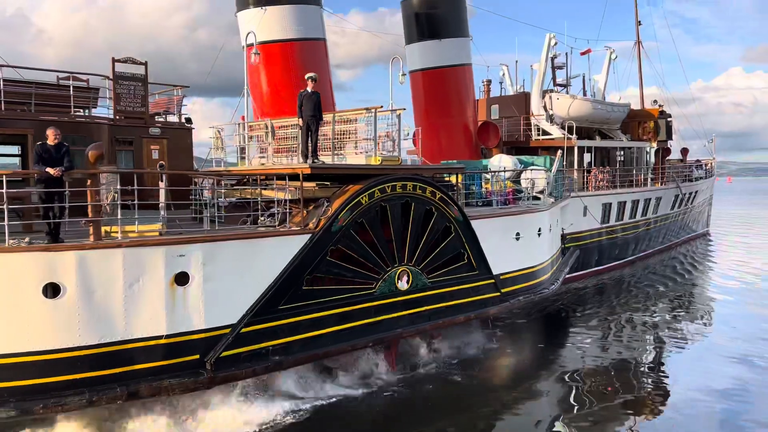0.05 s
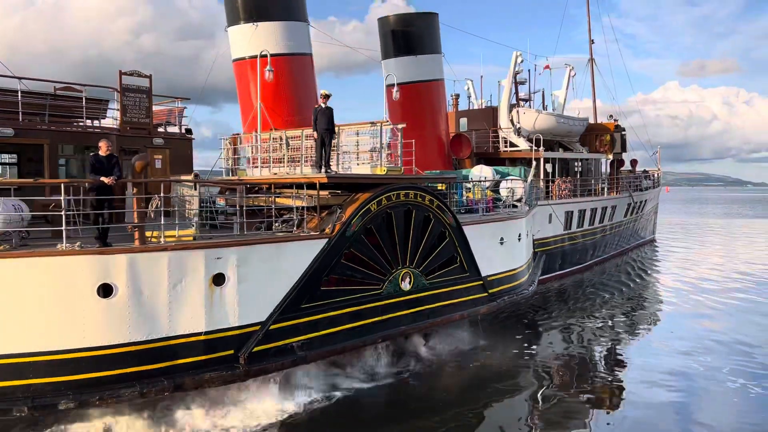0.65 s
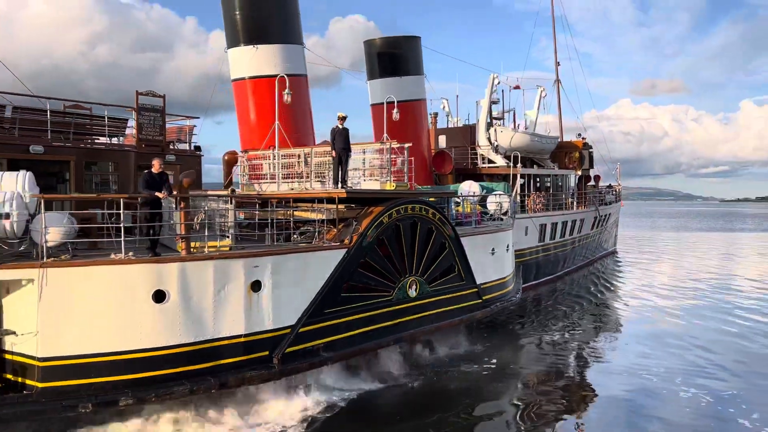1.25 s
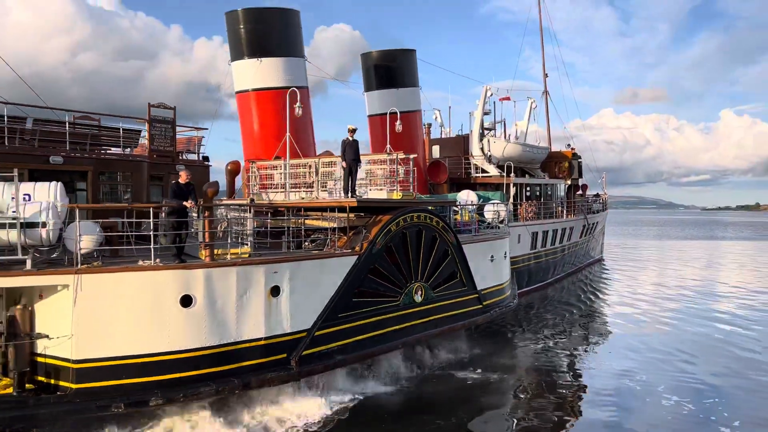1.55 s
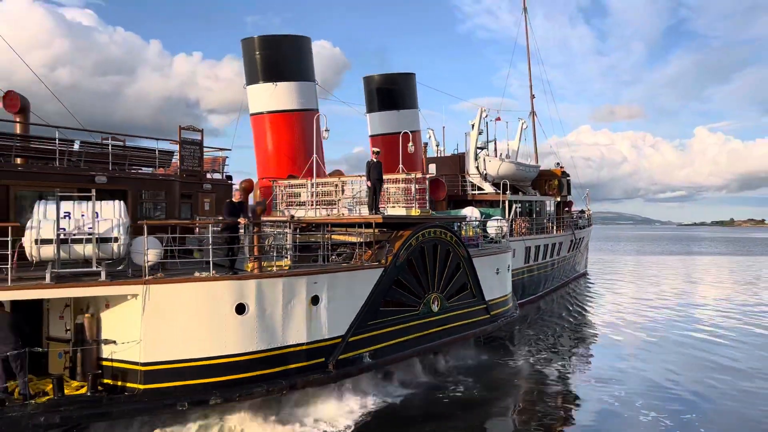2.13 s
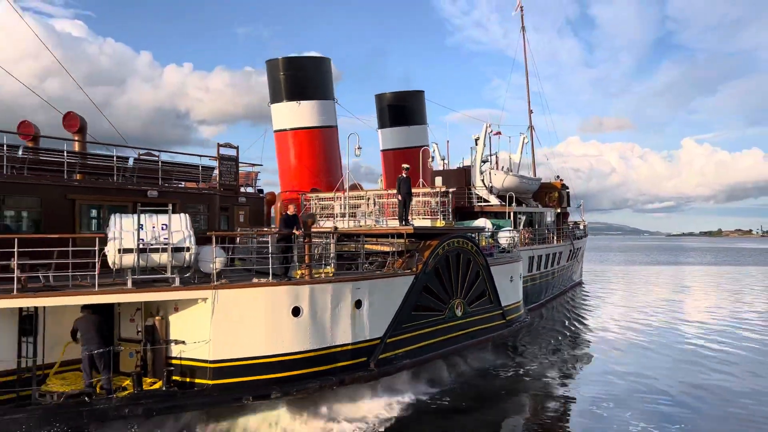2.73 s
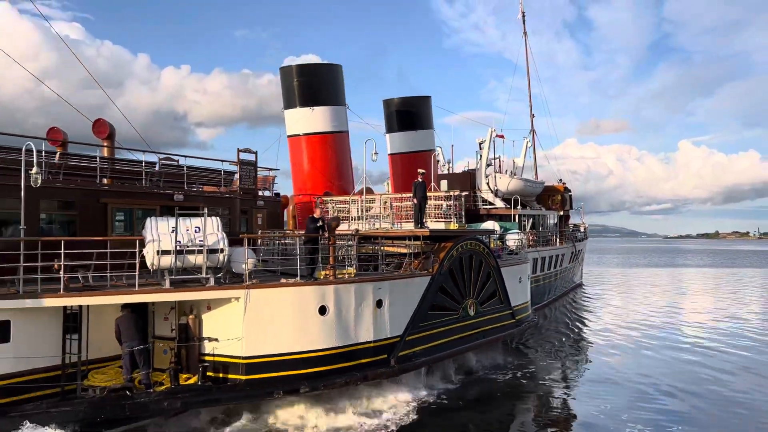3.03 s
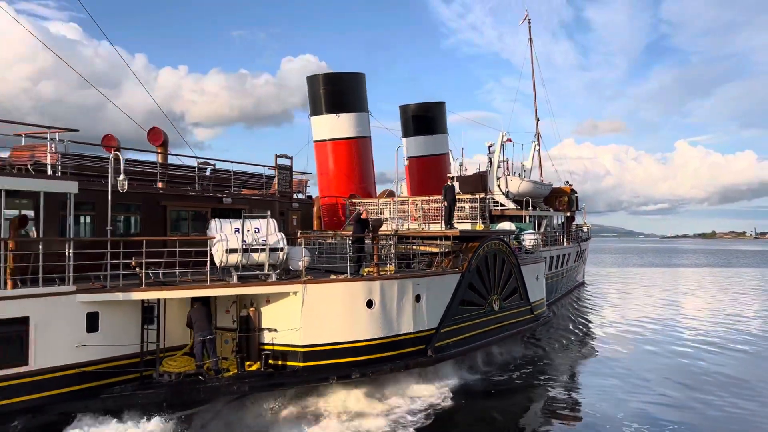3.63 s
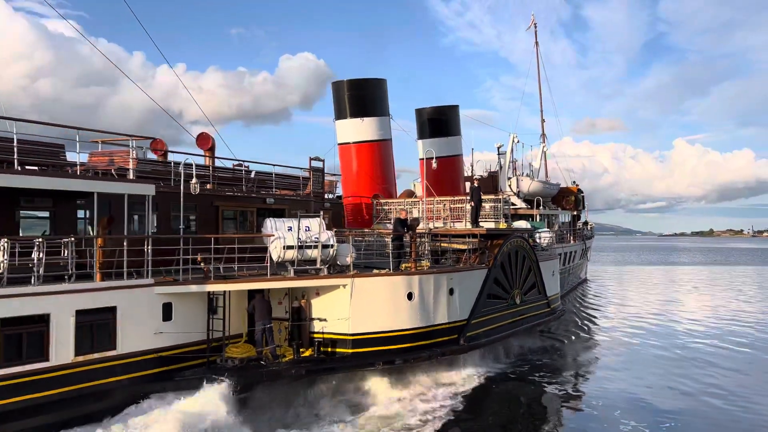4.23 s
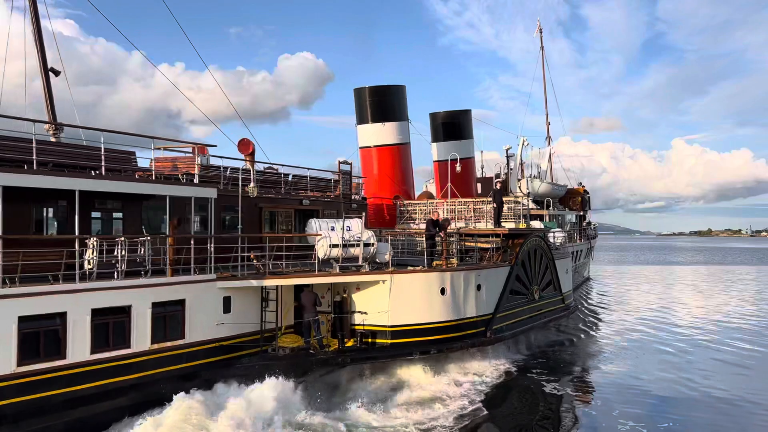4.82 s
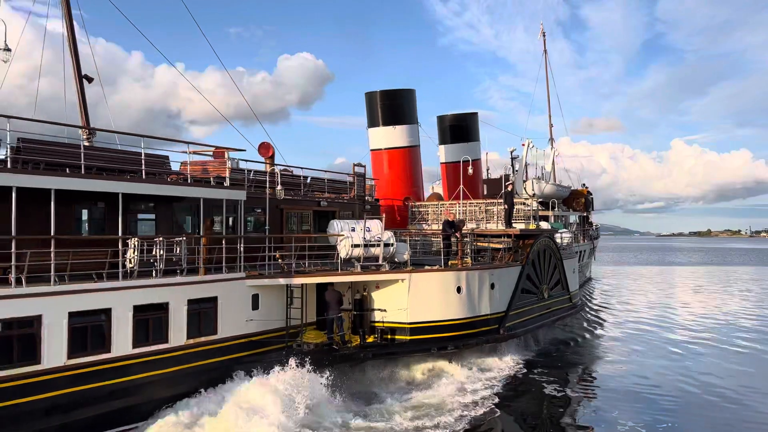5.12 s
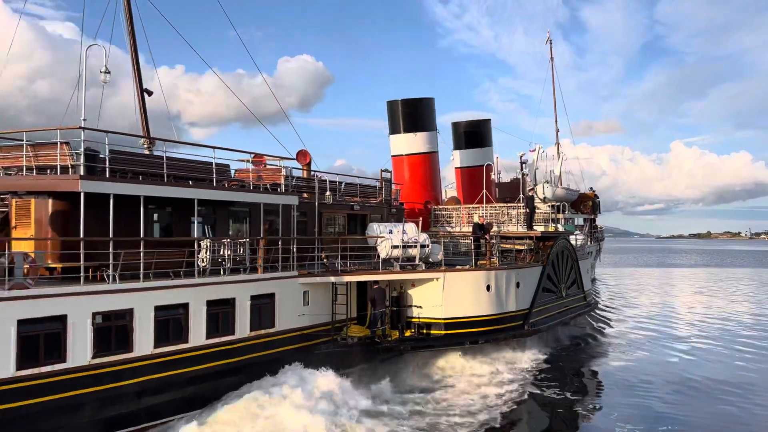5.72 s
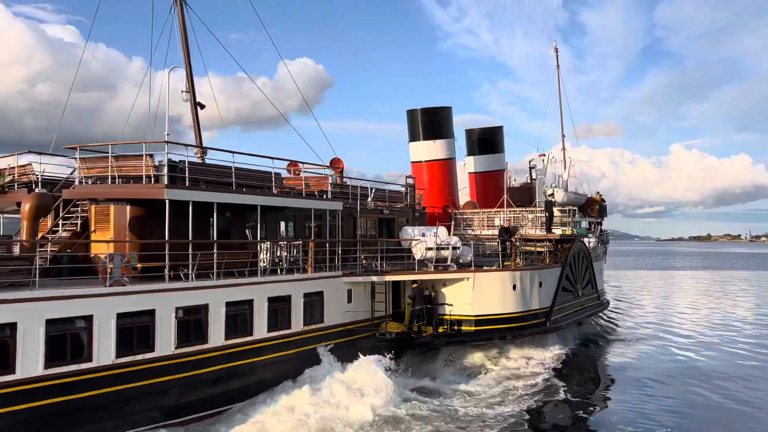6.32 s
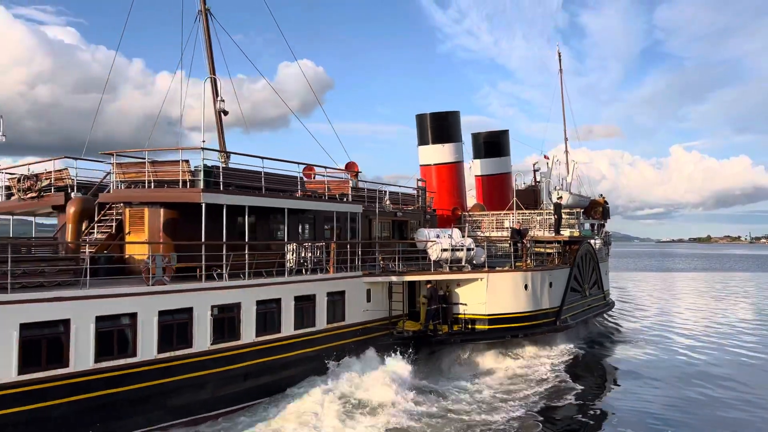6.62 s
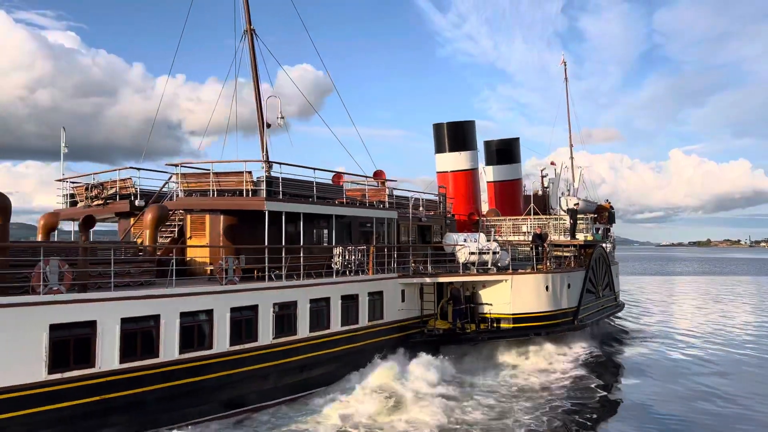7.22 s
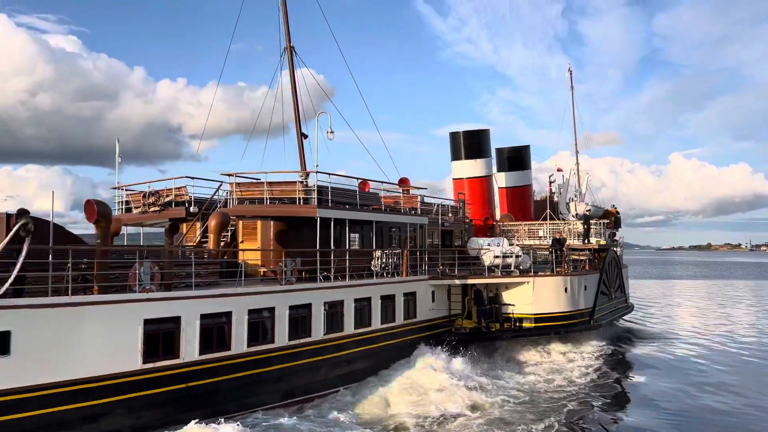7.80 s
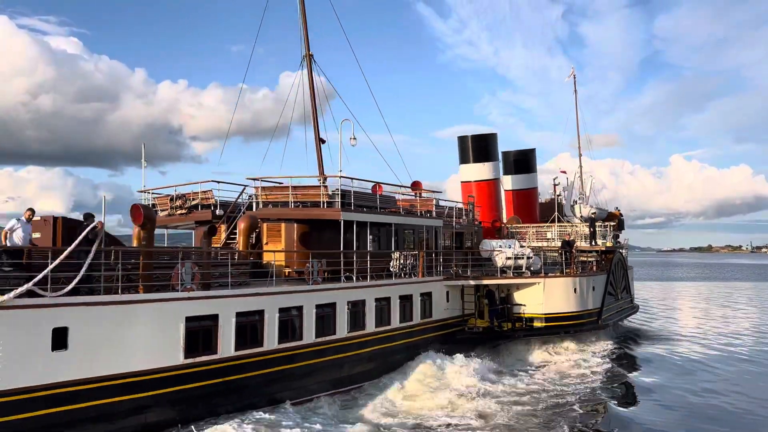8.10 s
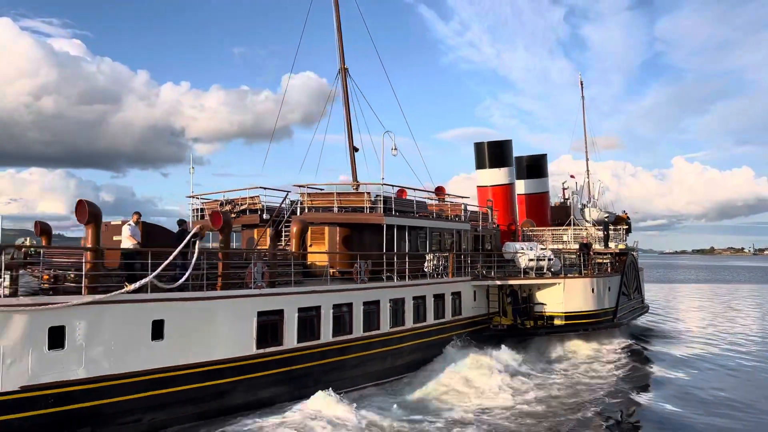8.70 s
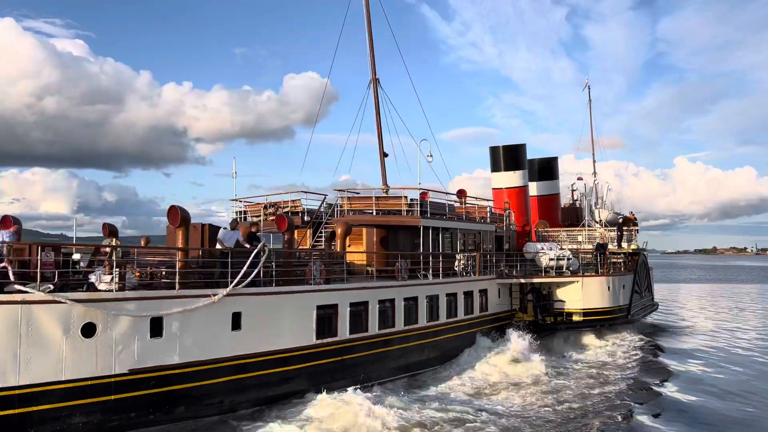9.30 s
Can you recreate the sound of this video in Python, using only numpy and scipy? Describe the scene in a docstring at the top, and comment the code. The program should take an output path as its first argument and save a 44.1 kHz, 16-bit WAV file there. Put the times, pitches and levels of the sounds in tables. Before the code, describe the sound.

A paddle steamer passes close by on calm water. From the start its wheel strikes the surface about three and a half times a second, quickening slightly, each stroke a slap, a low thud and a splash. Beneath runs a continuous deep rumble of wash, with gurgling bubbles and hissing foam. Heavy plunges thud in the first second, near 2 and 3 seconds, and around 5 seconds. Pockets of air boom now and then, and thrown water lands in short splats. From about 2 to 5.5 seconds a low, wavering machinery drone comes in repeated surges, returning faintly near the end. From about 6 seconds the strokes weaken and the wash grows gradually quieter and duller as the ship draws away, still churning at the end, just after 9 seconds. Light wind brushes the microphone throughout.

```python
"""A paddle steamer glides past close by over calm water, while a little wind brushes the microphone.
From the start the floats (boards) of its quickening wheel slap, thud and splash about 3.5 times a second.
Heavy plunges thud in the paddle box and air pockets boom; between blows the wash rumbles, gurgles,
splats and breaks into hissing foam. From about two seconds to five and a half, the machinery drone
surges most. Then the blows weaken and the wash grows quieter and duller as the ship draws away."""
import sys
import numpy as np
from scipy import signal
from scipy.fft import rfft, irfft
from scipy.io import wavfile
from scipy.ndimage import uniform_filter1d

SR = 44100
rng = np.random.default_rng(int(sys.argv[2]) if len(sys.argv) > 2 else 0)


def materialize(psi):
    """Save the field psi as 16-bit PCM at rate SR to the path in sys.argv[1].

    A 1-D psi becomes a single channel; in a 2-D psi each row is a channel.
    """
    bounded = np.clip(np.atleast_2d(psi).T, -1, 1)
    quanta = np.round(bounded * 32767).astype(np.int16)
    wavfile.write(sys.argv[1], SR, quanta)


N = 412335
T = np.arange(N) / SR
HZ = np.fft.rfftfreq(N, 1 / SR)

# the tone of hissing spray: pitch_hz, level_db
SPRAY_TONE = [(300, -16), (900, 3.3), (1180, 3.5), (1350, 0), (1540, 1.2), (1800, -0.3), (2450, -0.2),
              (2750, -1.6), (3750, -2.8), (4300, -6.7), (5300, -8.3), (5550, -16), (5850, -17.5),
              (6200, -13.2), (6800, -9.6), (8000, -6.6), (9000, -9.7), (11000, -11.7), (13000, -13.9),
              (15600, -15.6)]
# the tone of air driven under water: pitch_hz, level_db
THUD_TONE = [(24, -40), (48, -2), (110, 0), (170, -4), (300, -20.5), (550, -23), (1000, -33), (3000, -63)]
# the tone of a slap on the surface: pitch_hz, level_db
SLAP_TONE = [(150, -8), (300, 2), (520, 9), (760, 13), (1200, 9.5), (2400, 1), (4500, -4.5), (5800, -13.5),
             (8000, -9), (15000, -30)]
# each float of the wheel meets the water: start_s, slap_db, splash_db
FLOAT_HITS = [(0.029, 2.5, 3.5), (.338, 2, 3), (.634, 0, 1.5), (0.939, -0.5, 1), (1.238, 1, -2),
              (1.533, -2, -4), (1.836, 0, -5), (2.125, -6, -1), (2.434, -1, -3), (2.729, 0, -3),
              (3.018, -1, -6), (3.31, -6, -2.5), (3.597, -1, -6), (3.884, -3, -11), (4.174, -4, -10),
              (4.453, -4, -12), (4.749, -2.5, -5), (5.042, -8, -12), (5.317, -6, -6), (5.608, -5, -8),
              (5.891, -3.5, -6), (6.18, -13, -8), (6.46, -11, -16), (6.75, -15, -14), (7.03, -6, -11),
              (7.3, -9, -13), (7.58, -9, -10), (7.86, -10, -14), (8.131, -15, -20), (8.41, -24, -23),
              (8.691, -10.5, -22), (8.97, -24, -20), (9.29, -14, -18)]


def amp(db):
    """Turns decibels into a number to multiply by."""
    return 10 ** (np.asarray(db) / 20)


def evened(x):
    """Scales a signal to an average (rms) size of one."""
    return x / np.sqrt(np.mean(x ** 2) + 1e-20)


def at_each_pitch(points):
    """Joins the points of a table smoothly, giving a value for every pitch in HZ."""
    pitch_hz, value = np.transpose(points)
    return np.interp(np.log(HZ + 1), np.log(pitch_hz), value)


def coloured(x, tone):
    """Shapes x with a tone table, at an average size of one."""
    return evened(irfft(rfft(x) * amp(at_each_pitch(tone)), N))


def with_treble(x, edge_hz, treble_db):
    """Turns everything above edge_hz up or down by treble_db."""
    body = signal.sosfiltfilt(signal.butter(2, edge_hz, fs=SR, output="sos"), x)
    return body + (x - body) * amp(treble_db)


def wander(hz):
    """A random drift that changes up to about hz times a second."""
    return evened(irfft(rfft(rng.standard_normal(N)) * np.exp(-(HZ / hz) ** 2), N))


def hump(peak_s, half_s):
    """A smooth rise to one at peak_s and back down."""
    return np.exp(-((T - peak_s) / half_s) ** 2)


def blows(rows, rise_s):
    """The loudness over time of blows that jump up and die away; rows are start_s, level_db, fall_s."""
    power = np.zeros(N)
    for start_s, db, fall_s in rows:
        start = int(np.clip(round(start_s * SR), 0, N))
        age = T[:min(SR // 2, N - start)]
        blow = amp(db) * (1 - np.exp(-age / rise_s)) * np.exp(-age / fall_s)
        power[start:start + len(age)] += blow ** 2
    return np.sqrt(power)


def wheel_beat(rise_s, fall_s, uneven_db):
    """One blow for every float, each a little stronger or weaker by chance."""
    sizes_db = uneven_db * rng.uniform(-1, 1, len(FLOAT_HITS))
    return blows([(hit[0], db, fall_s) for hit, db in zip(FLOAT_HITS, sizes_db)], rise_s)


def distance_db(behind_m=0, sideways_m=21.64, head_start_m=2, speed_m_per_s=3.755):
    """Sound thins as it spreads: the level of a spot behind_m behind the wheel, 0 at its closest."""
    along_m = head_start_m - behind_m + speed_m_per_s * T
    return 20 * np.log10(sideways_m / np.hypot(sideways_m, along_m))


def foam(patch_db, patch_s, patch_hz):
    """Two white noises that swell together in short patches of time and pitch."""
    hz, t, noise = signal.stft(rng.standard_normal((2, N)), SR, nperseg=512, noverlap=384)
    patches = rng.standard_normal(noise.shape[1:])
    patches = uniform_filter1d(patches, max(1, round(patch_hz / hz[1])), axis=0)
    patches = uniform_filter1d(patches, max(1, round(patch_s / t[1])), axis=1)
    patchy = noise * amp(patch_db * evened(patches))
    return signal.istft(patchy, SR, nperseg=512, noverlap=384)[1][:, :N]


def bubbles(low_hz, high_hz, per_s, cycles, rise, spread_db, sizes=36):
    """Bubbles of many sizes ring for a few cycles, rising in pitch as they near the surface."""
    out = np.zeros((2, N))
    for hz in np.linspace(low_hz, high_hz, sizes):
        age = np.arange(0, 5, hz / cycles / SR)  # counted in fading times, not seconds
        ring = np.sin(2 * np.pi * cycles * age * (1 + rise * age)) * np.exp(-age) * np.sqrt(hz)
        for side, when, softness in rng.random((round(2 * per_s * T[-1] / sizes), 3)):
            part = out[int(2 * side), int(when * N):][:len(ring)]
            part += ring[:len(part)] * amp(-spread_db * np.log(max(softness, .02)))
    return evened(out - out.mean(axis=1, keepdims=True))


def wind(level_db=-45, gust_db=2):
    """Light gusts brush the microphone, swelling alike on both sides over a different rustle on each."""
    # the low tone of the breeze: pitch_hz, level_db
    wind_tone = [(10, -22), (35, -21), (80, 14), (200, 4), (800, -61), (3000, -68)]
    return amp(level_db + gust_db * wander(hz=3.0)) * coloured(rng.standard_normal((2, N)), wind_tone)


def machinery(pitch_hz=76.1, gain_db=-4, waver=0.03504, throb_db=2.5):
    """A wavering low drone comes in surges from inside the hull."""
    # the surges of the drone: time_s, level_db
    surges = [(0, -31), (.5, -50), (1.4, -35), (1.9, -26), (2.15, -18.5), (2.36, -34), (2.62, -29),
              (2.82, -19), (2.98, -38), (3.25, -19), (3.45, -29), (3.62, -23), (3.8, -37), (4.05, -27),
              (4.3, -18), (4.41, -27), (4.5, -20), (4.63, -31), (4.8, -19), (4.97, -36), (5.1, -21),
              (5.25, -31), (5.43, -15), (5.75, -40), (7.7, -27), (8.5, -45), (8.93, -25), (9.35, -31)]
    time_s, level_db = np.transpose(surges)
    turns = np.cumsum(pitch_hz * (1 + waver * wander(hz=5.24))) / SR
    drone = evened(np.sin(2 * np.pi * turns) * amp(throb_db * wander(hz=7.5)))
    return amp(np.interp(T, time_s, level_db) + gain_db) * drone


def wake(level_db=-55):
    """Countless small bubbles seethe in the wake, which stays close by as the wheel moves off."""
    seethe = bubbles(low_hz=1407, high_hz=4195, per_s=1200, cycles=10, rise=0.0152, spread_db=3.5)
    return amp(level_db) * seethe


def rumble(level_db=-22, falloff=0.35, surge_db=2, drift_db=0.1):
    """Big clouds of trapped air pulse in the wash, surging after each float; the deepest carry farthest."""
    # the tone of the air clouds: pitch_hz, level_db
    rumble_tone = [(15, -45), (28, -20), (42, -6), (60, -2), (80, 0.5), (100, -1.5), (148, 0), (190, -5.5),
                   (245, -9), (310, -19.5), (1500, -70)]
    clouds = bubbles(low_hz=40, high_hz=330, per_s=900, cycles=1.6, rise=.02, spread_db=1)
    churn = with_treble(coloured(clouds, rumble_tone), edge_hz=140, treble_db=2.5 + distance_db())
    swell_db = surge_db * wheel_beat(rise_s=0.0094, fall_s=0.059, uneven_db=3)
    swell_db += drift_db * wander(hz=3.5)
    return amp(level_db + falloff * distance_db() + swell_db) * churn


def gurgle(level_db=-28, bubbles_db=-10, falloff=1.23):
    """The crest of the wash tumbles behind the wheel: a rush with big bubbles in it, duller from afar."""
    # the tone of the tumbling water: pitch_hz, level_db
    gurgle_tone = [(90, -13), (170, 5), (235, 6), (300, -2.5), (360, -2), (450, 1.4), (680, -3.5),
                   (850, -6), (1150, -13), (1400, -12), (2200, -21), (6000, -47)]
    # slabs of water fold over and the churn swells: peak_s, extra_db, half_length_s
    heaves = [(.24, 1.5, 0.14), (0.677, 3, 0.073), (1.307, 2.5, 0.042), (3.762, 0.5, .13),
              (7.42, 1.5, 0.21)]
    rush = foam(patch_db=0.34, patch_s=.02, patch_hz=296)
    plops = bubbles(low_hz=279.4, high_hz=1506, per_s=1500, cycles=5, rise=0.026, spread_db=1)
    heave_db = sum(db * hump(peak_s, half_s) for peak_s, db, half_s in heaves)
    away_db = distance_db(behind_m=7)
    churn = coloured(rush + amp(bubbles_db) * plops, gurgle_tone)
    churn = with_treble(churn, edge_hz=520, treble_db=1.7 + 0.97 * away_db)
    return amp(level_db + falloff * away_db + heave_db) * churn


def spray(level_db=-33.5, fizz_db=-15, dulling_db_per_s=0.32, falloff=1.57):
    """Falling spray and bursting foam hiss, growing duller as the wheel draws away."""
    hiss = foam(patch_db=1.0, patch_s=0.048, patch_hz=937)
    fizz = bubbles(low_hz=1202, high_hz=9920, per_s=1600, cycles=13.6, rise=0.014, spread_db=0.5)
    water = coloured(hiss + amp(fizz_db) * fizz, SPRAY_TONE)
    water = with_treble(water, edge_hz=5100, treble_db=0.34 - dulling_db_per_s * T)
    return amp(level_db + falloff * distance_db(behind_m=3)) * water


def breakers(gain_db=-35):
    """A toppling crest swells into a patchy hiss and sinks back."""
    # crests of the wash topple into foam: peak_s, level_db, half_length_s
    crests = [(0.307, -1, 0.074), (2.336, -1, 0.12), (3.1, -8, .25), (3.6, -8, 0.17), (4.86, -5, 0.11),
              (5.2, -11, .25), (5.55, -9.5, 0.2), (6.51, -8, 0.15)]
    swell = sum(amp(db) * hump(peak_s, half_s) for peak_s, db, half_s in crests)
    return amp(gain_db) * swell * coloured(foam(patch_db=2.5, patch_s=.018, patch_hz=1100), SPRAY_TONE)


def splats(gain_db=-23):
    """Loose lumps of thrown water fall back with a splat."""
    # each lump lands: start_s, level_db, fall_s
    landings = [(1.028, -4, .012), (2.316, -14, 0.013), (2.837, -3, 0.0092), (3.106, -6, 0.01),
                (3.281, -2, 0.0096), (3.833, -6, .012), (4.851, -6, 0.01), (5.171, -6, 0.012),
                (6.53, -8.5, 0.013), (6.664, -9, 0.011), (7.089, -9, .006), (7.119, -7, .006)]
    return amp(gain_db) * blows(landings, rise_s=0.0014) * coloured(rng.standard_normal((2, N)), SLAP_TONE)


def booms(rise=0.016, waver=0.025):
    """A pocket of air swells and dies on one note that climbs a little as it nears the surface."""
    # pockets break loose, big ones booming, smaller ones glugging: start_s, pitch_hz, level_db, swell_s
    pockets = [(0.121, 60, -23.5, 0.064), (.352, 634, -31, .008), (0.629, 107.7, -19.5, .035),
               (1.027, 429, -24, .009), (1.261, 54.3, -24, 0.045), (1.5, 66.5, -24, .035),
               (1.835, 131, -19.5, 0.028), (2.42, 50, -24, 0.027), (2.55, 373, -31, .01),
               (3.005, 47.2, -23.5, 0.033), (3.019, 603, -29, .005), (3.985, 150, -19, 0.021),
               (4.26, 176.7, -25.5, 0.037), (5.5, 64.2, -20, 0.031), (5.885, 84.4, -22, 0.036),
               (6.45, 79.5, -19.5, .028), (6.461, 427, -31.5, .009), (7.031, 47.6, -24, 0.03),
               (7.088, 632, -31, .005), (7.09, 175, -29.5, 0.04), (7.21, 116.7, -24, 0.024),
               (7.565, 83.7, -26, .025), (7.585, 110.6, -26, 0.028), (7.59, 47, -28, 0.041),
               (8.4, 150.5, -27.5, 0.027), (8.67, 52, -21, 0.041), (8.69, 109.4, -26, 0.023)]
    out = np.zeros(N)
    wobble = 1 + waver * wander(hz=30)
    for (start_s, hz, db, swell_s), first_turn in zip(pockets, rng.random(len(pockets))):
        start = round(start_s * SR)
        span = slice(start, start + SR)
        age = np.maximum(T[span] - start_s, 0) / swell_s  # 1 at the loudest moment
        turns = first_turn + np.cumsum(hz * (1 + rise * age) * wobble[span]) / SR
        out[span] += amp(db) * age * np.exp(1 - age) * np.sqrt(2) * np.sin(2 * np.pi * turns)
    return out


def plunges(gain_db=-6):
    """A mass of water and air slams under the paddle box, the wheel's cover, with a heavy thud."""
    # each slam: start_s, level_db, fall_s
    slams = [(.03, -10.5, 0.13), (.335, -9, 0.04), (.634, -8, 0.089), (1.02, -13, 0.029), (1.27, -17, .05),
             (1.835, -17, 0.064), (2.118, -5, 0.026), (3.018, -6, .03), (3.19, -8.5, 0.038),
             (3.275, -7, 0.026), (4.176, -13, .022), (4.29, -16, 0.04), (4.83, -11.5, 0.088),
             (5.047, -10, 0.039), (5.46, -11, 0.055), (7.07, -13.5, 0.11), (7.586, -12, 0.049),
             (8.133, -16, 0.02), (8.688, -12, 0.029)]
    return amp(gain_db) * blows(slams, rise_s=0.0025) * coloured(rng.standard_normal((2, N)), THUD_TONE)


def mist(gain_db=-43, early_s=0.038, half_s=0.029, low_hz=6000):
    """Just before each stroke, the float leaving the water flings off a fine mist."""
    swell = sum(amp(db) * hump(start_s - early_s, half_s) for start_s, _, db in FLOAT_HITS)
    hiss = coloured(rng.standard_normal((2, N)), SPRAY_TONE)
    fine_hiss = signal.sosfilt(signal.butter(4, low_hz, "high", fs=SR, output="sos"), hiss)
    return amp(gain_db) * swell * evened(fine_hiss)


def paddles(slap_db=-22, crack_db=-32, thud_db=-24, splash_db=-31.5, crack_falloff=1.5, thud_falloff=0.57):
    """Each float slaps the surface with a bright crack, drives air under, and throws up water."""
    slap_noise, crack_noise, thud_noise = rng.standard_normal((3, 2, N))
    strike = blows([(start_s, db, .0085) for start_s, db, _ in FLOAT_HITS], rise_s=0.0015)
    shower = blows([(start_s, db, .075) for start_s, _, db in FLOAT_HITS], rise_s=0.011)
    push = wheel_beat(rise_s=0.0025, fall_s=0.033, uneven_db=5)
    slap = amp(slap_db) * coloured(slap_noise, SLAP_TONE)
    crack = amp(crack_db + crack_falloff * distance_db()) * coloured(crack_noise, SPRAY_TONE)
    thud = amp(thud_db + thud_falloff * distance_db()) * coloured(thud_noise, THUD_TONE)
    splash = amp(splash_db) * coloured(foam(patch_db=0.2, patch_s=.015, patch_hz=1490), SPRAY_TONE)
    return strike * (slap + crack) + push * thud + shower * splash


def with_echo(x, delay_s=.00221, first_db=-18, last_db=-13, band_hz=(900, 5000)):
    """A small surface by the microphone echoes the middle pitches; the rush grows hollower with time."""
    band = signal.butter(3, band_hz, "band", fs=SR, output="sos")
    echo = signal.sosfilt(band, np.roll(x, round(delay_s * SR), axis=1))
    return x - amp(np.linspace(first_db, last_db, N)) * echo


def left_and_right(pair):
    """Turns two unrelated signals into what two close microphone openings hear from a wide source."""
    # how alike the two sides are: pitch_hz, likeness (0 to 1)
    likeness = [(230, .997), (430, .95), (600, .8), (820, .96), (950, .62), (1370, .74), (1640, .17),
                (1820, .72), (2020, .77), (2220, .42), (2500, .71), (3000, .57), (3210, .22), (3400, .53),
                (3620, .18), (3830, .54), (4040, .36), (4350, .62), (5350, .64), (5800, .89), (6300, .92),
                (8400, .8), (9600, .97), (10700, .97), (12000, .85)]
    # how far the left wave runs ahead of the right: pitch_hz, lead_radians
    left_lead = [(40, 0), (230, -.2), (390, .48), (540, .4), (860, 2.2), (1220, 1.55), (1380, 3.3),
                 (1550, 4.6), (1740, 3.4), (2080, 6.1), (2350, 5.9), (3150, 7.9), (3900, 7), (5100, 7.1),
                 (5800, 6.3), (7400, 6.15), (8700, 4.8), (9500, 3.3), (10700, 3), (12500, .6), (14400, 0),
                 (15600, -1.8)]
    # how much louder the left side is: pitch_hz, left_minus_right_db
    balance = [(120, -.3), (300, -.1), (480, -1.5), (620, -5), (790, 0), (1140, 5.2), (1340, -1.1),
               (1550, .8), (1900, -4.4), (2200, -.4), (2650, 0), (2850, 1.7), (3600, 4.4), (4350, 3.2),
               (5200, 4.7), (5500, 1), (6000, 0), (8000, 1.5), (10000, 0)]
    alike = np.clip(at_each_pitch(likeness), 0, 1)
    shared, apart = rfft(pair)
    shared *= np.sqrt((1 + alike) / 2)
    apart *= np.sqrt((1 - alike) / 2)
    tilt = amp(at_each_pitch(balance) / 2)
    left = (shared + apart) * tilt
    right = (shared - apart) / tilt * np.exp(-1j * at_each_pitch(left_lead))
    return irfft(np.array([left, right]), N)


def scene():
    """The wheel and its wash, the drone and the breeze."""
    water = paddles() + mist() + plunges() + splats() + breakers() + gurgle() + spray() + wake()
    return left_and_right(with_echo(water) + rumble()) + booms() + machinery() + wind()


def record(dry):
    """Cuts away the very highest treble."""
    top_hz = 15750
    treble_cut = signal.firwin(511, top_hz, window=("kaiser", 9), fs=SR)
    return signal.oaconvolve(dry, treble_cut[None], "same", axes=1)


dry = scene()
out = record(dry)
materialize(out)
```